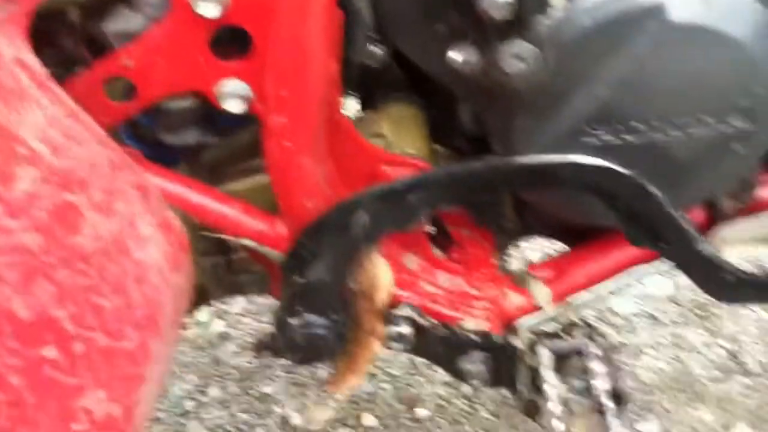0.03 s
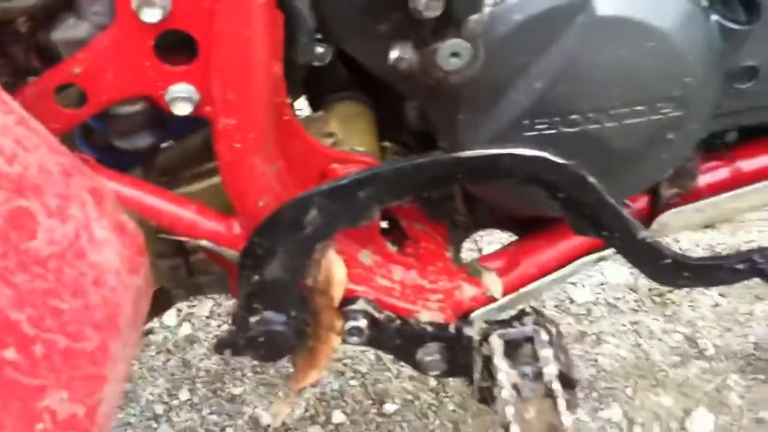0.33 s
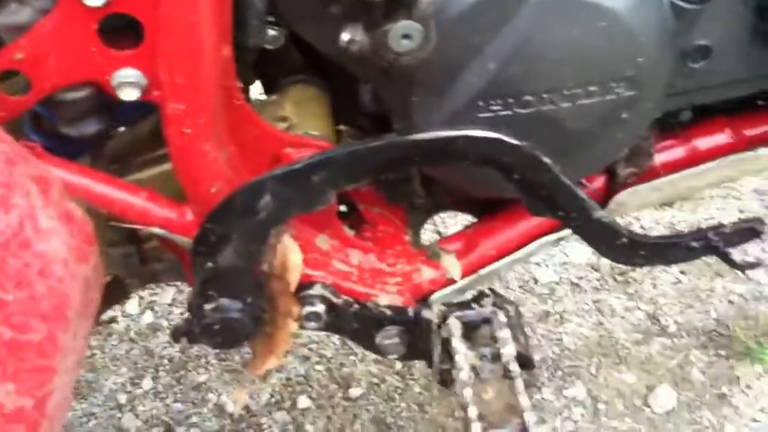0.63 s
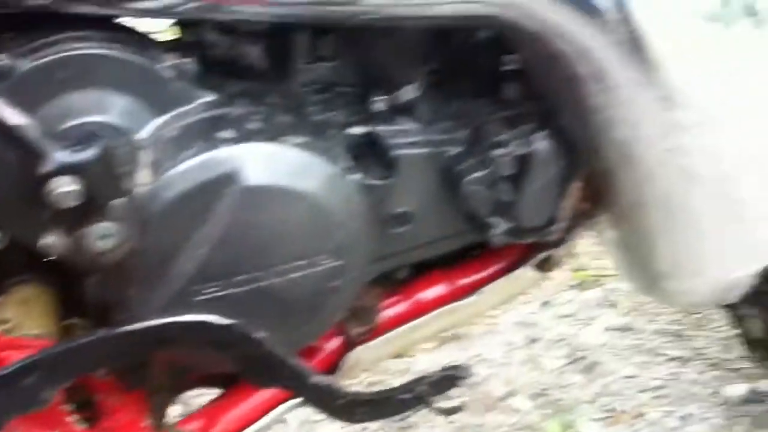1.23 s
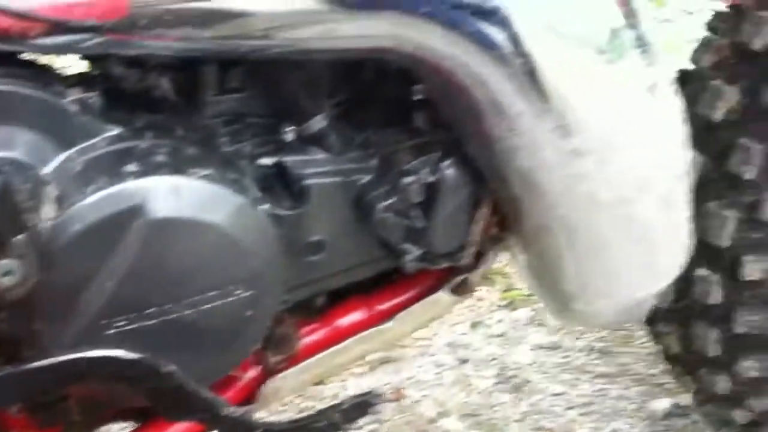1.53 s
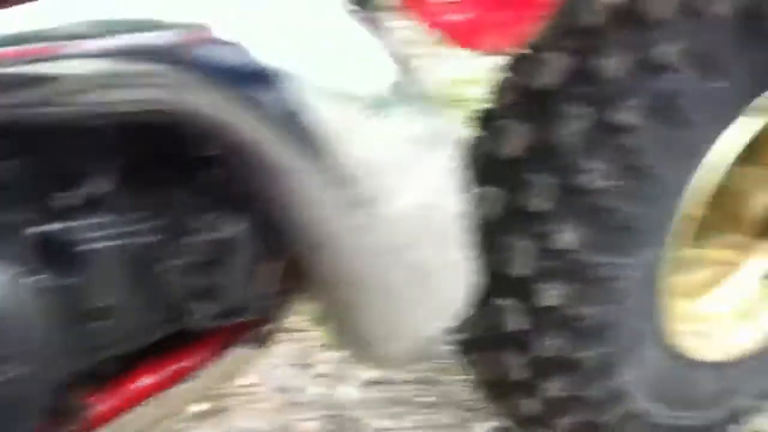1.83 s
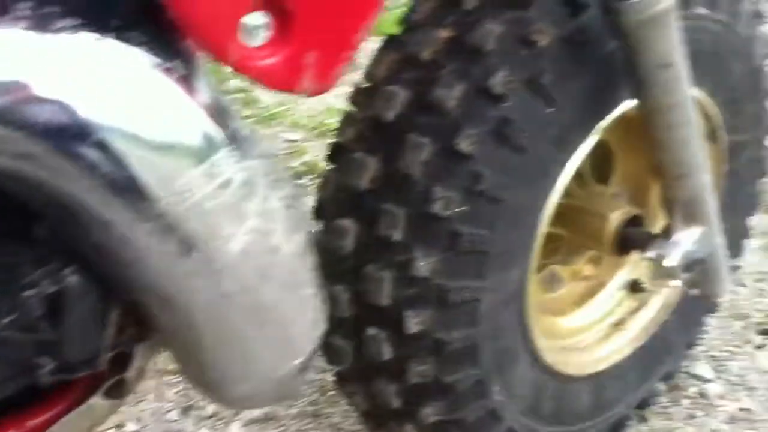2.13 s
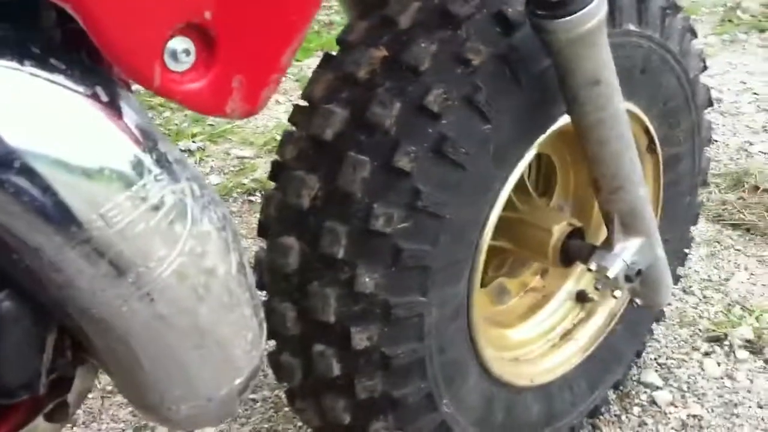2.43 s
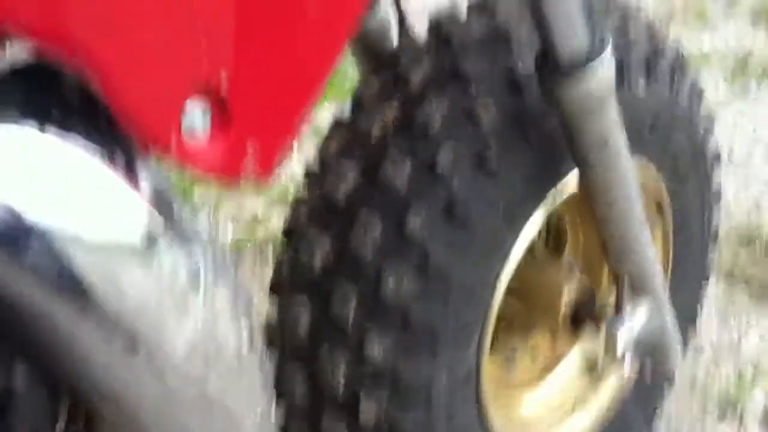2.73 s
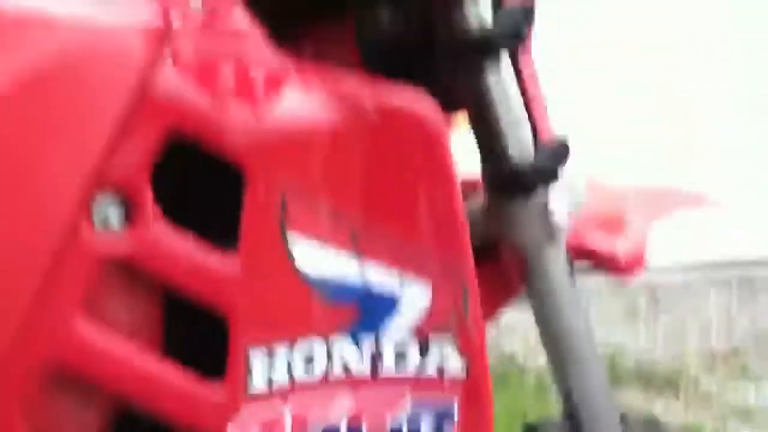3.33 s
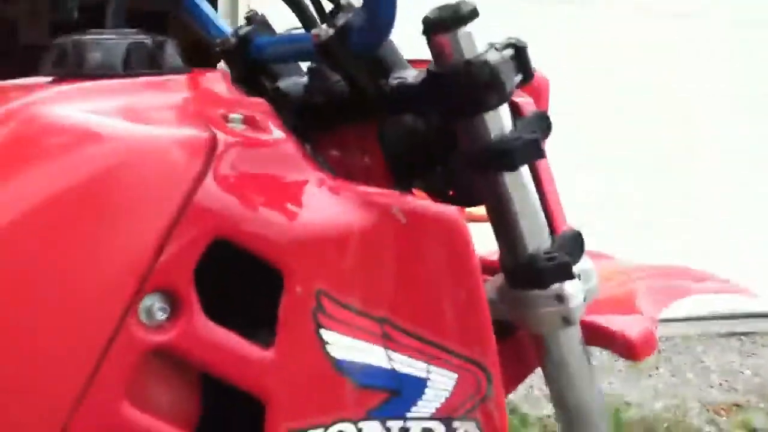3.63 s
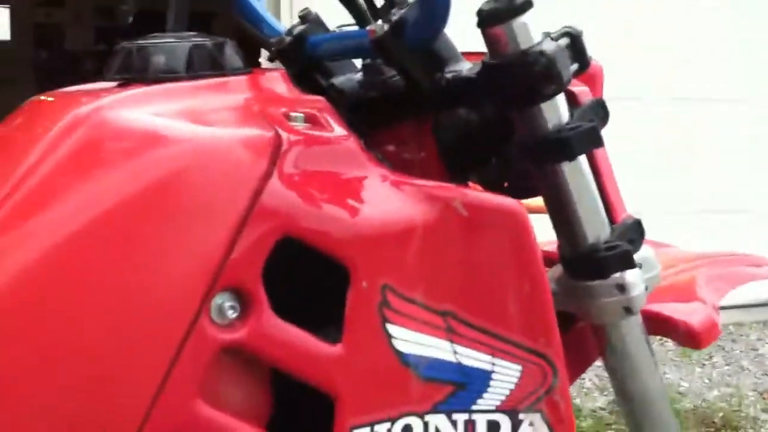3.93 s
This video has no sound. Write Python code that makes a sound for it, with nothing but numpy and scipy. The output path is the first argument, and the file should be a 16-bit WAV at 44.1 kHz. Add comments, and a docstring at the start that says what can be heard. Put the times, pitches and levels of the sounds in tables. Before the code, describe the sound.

A two-stroke engine idles close by, with uneven rapid pops and metallic rattling.

```python
"""A single-cylinder two-stroke engine idles outdoors, close by. From the start, every turn of the crank
puffs through the exhaust, but only some turns fire: those pop harder, ring the pipe and knock the piston
against the finned cylinder. Gears whirr and rattle underneath. As the listener walks along the engine,
the metallic ring changes colour and the crankcase comes forward. Slack gear teeth clack three times
around 1.6 s; near 3.7 s they clack once more, as the crankcase ring recedes."""
import sys
import numpy as np
from scipy import signal
from scipy.fft import rfft, irfft
from scipy.io import wavfile
from scipy.ndimage import uniform_filter1d

SR = 44100
rng = np.random.default_rng(int(sys.argv[2]) if len(sys.argv) > 2 else 0)


def waveform_to_disk(signal):
    """Save audio, clipped to [-1, 1], as 16-bit WAV at the path in sys.argv[1]."""
    frames = np.transpose(np.atleast_2d(signal))
    scaled = np.clip(frames, -1, 1) * 32767
    samples = np.round(scaled).astype(np.int16)
    wavfile.write(sys.argv[1], SR, samples)


N = 176400
HARD_KNOCK_DB = -18  # reference level of a hard firing's knock
KNOCK_LEAD_S, KNOCK_RISE_S = .004, .0042  # a knock starts just ahead of its turn


def amp(db):
    """Decibels to gain."""
    return 10 ** (np.asarray(db) / 20)


def unit(x):
    """Scales to rms 1."""
    return x / np.sqrt(np.mean(x ** 2) + 1e-20)


def colour(x, spectrum):
    """Equalises with a (frequency [Hz], level [dB]) curve, keeping the power of white noise."""
    hz, db = np.transpose(spectrum)
    bins_hz = np.fft.rfftfreq(len(x), 1 / SR)
    gains = amp(np.interp(np.log(bins_hz + 1), np.log(hz + 1), db))
    return irfft(rfft(x) * unit(gains), len(x))


def ramp(u):
    """Smooth step from 0 to 1."""
    return np.sin(np.pi / 2 * np.clip(u, 0, 1))


def bell(t, width_s):
    """Bell-shaped envelope around t = 0."""
    return np.exp(-(t / width_s) ** 2)


def sine(t, hz):
    """Pure tone."""
    return np.sin(2 * np.pi * hz * t)


def play(times, gains, shape):
    """Sums one shape, a function of the time since the event, from 30 ms before to 80 ms after each."""
    out = np.zeros(N)
    for at, gain in zip(times, gains):
        i = np.arange(max(0, int((at - .03) * SR)), min(N, int((at + .08) * SR)))
        out[i] += gain * shape(i / SR - at)
    return out


def follow(points, column=1):
    """Reads a time curve at every sample."""
    table = np.transpose(points)
    return np.interp(np.arange(N) / SR, table[0], table[column])


def resonate(x, hz, width_hz):
    """A resonance of gain 1 whose pitch may move."""
    carrier = np.exp(2j * np.pi * np.cumsum(hz * np.ones(N)) / SR)
    pole = np.exp(-np.pi * width_hz / SR)
    return 2 * (carrier * signal.lfilter([1 - pole], [1, -pole], x / carrier)).real


def crank():
    """The rhythm: between cued turns the crank coasts, slowing a little with every turn."""
    # turns heard singly, mostly firing pops, plus a few weak puffs with hardly any knock:
    # (time [s], exhaust level [dB], piston knock [dB])
    cues = [(-0.001, -8.5, -24), (0.0203, -6, -23.5), (0.0416, -4, -25), (0.063, -6.5, -18.5),
            (0.1928, -7, -17), (0.2142, -9, -38), (0.342, -5, -22.5), (0.3633, -6, -26), (0.449, -5, -24.5),
            (0.4703, -5, -23.5), (0.5121, -4.5, -22), (0.5977, -6, -25.5), (0.6197, -5, -27),
            (0.6415, -4, -22.5), (0.6628, -6, -18.5), (0.791, -7, -18.5), (0.813, -6.5, -24.5),
            (0.9416, -6, -17), (0.9843, -5.5, -20.5), (1.113, -6, -23.5), (1.1355, -6.5, -16.5),
            (1.2657, -7, -16.5), (1.4143, -6, -29.5), (1.457, -6, -19.5), (1.5881, -6.5, -24.5),
            (1.6101, -5, -17), (1.7365, -4.5, -21.5), (1.843, -5, -25.5), (1.8644, -4.5, -21.5),
            (1.9496, -5.5, -23), (1.992, -5, -23.8), (2.0777, -4.5, -19.5), (2.0993, -9.5, -42),
            (2.164, -5.5, -23), (2.207, -5.5, -28), (2.2489, -6, -18), (2.3776, -5.5, -23.5),
            (2.3996, -5.0, -21.5), (2.4856, -6.5, -30), (2.5069, -9, -35), (2.5283, -6, -18),
            (2.6128, -6.5, -22.5), (2.6554, -5.5, -24.5), (2.6981, -6.5, -29.5), (2.7398, -4, -17.5),
            (2.8902, -7, -17.5), (2.9118, -8, -35), (2.9985, -6.5, -28), (3.0195, -5, -22.5),
            (3.062, -7.5, -33), (3.104, -7.5, -32), (3.1468, -7.5, -30), (3.1897, -4, -22.5),
            (3.233, -4.5, -17.5), (3.3174, -7, -30.5), (3.3381, -6.5, -34), (3.359, -13, -48),
            (3.379, -4.5, -19), (3.5289, -5, -21.5), (3.5506, -5.5, -21), (3.701, -5, -17),
            (3.8083, -4.5, -22.5), (3.8302, -4.5, -21), (3.9371, -5, -18), (3.9583, -12.5, -48)]
    # puff of the coasting turns in between: (time [s], level [dB])
    coast_puffs = [(0, -12), (.24, -9.5), (.42, -8.5), (.56, -8), (.75, -10), (.92, -10.5), (1.06, -11.5),
                   (1.22, -11.5), (1.33, -8), (1.43, -8.5), (1.5, -13), (1.56, -14.5), (1.66, -6),
                   (1.8, -6), (2.15, -9), (2.45, -6.5), (2.7, -9), (2.8, -10.5), (2.93, -8), (3.14, -6.5),
                   (3.3, -5.5), (3.43, -11.5), (3.52, -8), (3.62, -9.5), (3.76, -9), (3.9, -6.5), (4, -7.5)]
    turn_s, sag_s_per_turn = .0214, .00019
    spent_db, spent_s = -6, .073  # puffs stay weak for a while after a hard firing
    cue_times, cue_puff_db, cue_knock_db = np.transpose(cues)
    cue_turns = 4 + np.r_[0, np.cumsum(np.round(np.diff(cue_times) / turn_s))].astype(int)
    turns = np.arange(cue_turns[-1] + 10)
    times = turns * turn_s + np.interp(turns, cue_turns, cue_times - cue_turns * turn_s)
    upcoming = np.clip(np.searchsorted(cue_turns, turns), 1, len(cue_turns) - 1)
    sag = np.maximum((turns - cue_turns[upcoming - 1]) * (cue_turns[upcoming] - turns), 0)
    times -= sag_s_per_turn / 2 * sag
    since = times[:, None] - cue_times
    hardness = np.minimum(amp(cue_knock_db - HARD_KNOCK_DB), 1)
    spent = ((since > turn_s / 2) * bell(since, spent_s) * hardness).max(1)
    scatter = rng.standard_normal((len(turns), 2))
    puff_db = np.interp(times, *np.transpose(coast_puffs)) + spent_db * spent + .9 * scatter[:, 0]
    knock_db = -42 - .5 * scatter[:, 1]  # a coasting piston only taps
    puff_db[cue_turns], knock_db[cue_turns] = cue_puff_db, cue_knock_db
    return times, np.isin(turns, cue_turns), puff_db, knock_db


def exhaust(times, cued, puff_db, knock_db):
    """The open port lets out a puff and a rush of gas; the pipe rings on, and hard firings thump."""
    # rush of gas at the port: (frequency [Hz], level [dB])
    gas_spectrum = [(200, -9), (450, 0), (600, -6), (830, 0.5), (1200, 5.5), (1700, 5), (3000, -6),
                    (8000, -37)]
    port_open_s, port_rise_s, port_shut_s = .0103, .0038, .003
    pipe_rise_s, pipe_decay_s = .00076, .0093
    null_hz, null_width_hz = 215, 78  # the silencer cancels this band
    outlet_hz = 100  # the narrow outlet radiates little below this

    def port_puff(t):
        return sine(t, hz=379) * ramp(t / port_rise_s) * ramp((port_open_s - t) / port_shut_s)

    def pipe_ring(t):
        return sine(t, hz=401.8) * ramp(t / pipe_rise_s) * np.exp(-abs(t) / pipe_decay_s)

    def low_thud(t, hz=163):
        return -np.cos(2 * np.pi * hz * t) * bell(t, width_s=.0078)

    size = amp(puff_db)
    puff = play(times, size * amp(-.6), port_puff)
    pipe_delay_s = np.where(cued, .00859, .010105)
    pipe = play(times + pipe_delay_s, size * amp(np.where(cued, -6, -13.5)), pipe_ring)
    gas = play(times + .00065, size * amp(-21.5), lambda t: bell(t, width_s=.0054))
    gas *= colour(rng.standard_normal(N), gas_spectrum)
    thud = play(times + .00706, np.full(len(times), amp(-40)), low_thud)
    weight = amp(knock_db - HARD_KNOCK_DB) ** 2
    shake = play(times, amp(-39.5) * weight, lambda t: sine(t, hz=46.7) * bell(t, width_s=.0048))
    boom = play(times + .0038, amp(-29.5) * weight, lambda t: sine(t, hz=112) * bell(t, width_s=.0045))
    silencer = signal.iirnotch(null_hz, null_hz / null_width_hz, fs=SR)
    outlet = signal.butter(4, outlet_hz, "highpass", fs=SR, output="sos")
    note = signal.filtfilt(*silencer, puff + pipe + gas)
    return signal.sosfiltfilt(outlet, note + thud + boom) + shake


def piston(times, knock_db):
    """Each knock is a scuff, a crack that stands out on hard hits, then a dense ring of the cases."""
    # tone colour of the cylinder and cases: (frequency [Hz], level [dB])
    casing_spectrum = [(300, -24.5), (800, 5), (1200, -6), (1600, -17.5), (2600, -0.5), (3050, -7),
                       (3400, -5), (4200, -5), (4800, -1), (5100, -10.5), (6000, -2.5), (7300, -6),
                       (8500, -4), (10200, -2), (12000, -9.5), (13500, -14.5), (15500, -34)]
    # how long they ring: (frequency [Hz], t60 [s])
    casing_decay = [(500, 0.081), (1500, 0.22), (3000, 0.22), (6000, 0.27), (10000, 0.15), (15000, 0.13)]
    crack_db, crack_growth, crack_fall_s = -3.5, .8, .0025
    scuff_db, scuff_lead_s, ring_db = -14, .007, 1

    def crack(t):
        return ramp(t / KNOCK_RISE_S) * np.exp(-np.maximum(t - KNOCK_RISE_S, 0) / crack_fall_s)

    starts, size = times - KNOCK_LEAD_S, amp(knock_db)
    cracks = play(starts, size * amp(crack_growth * (knock_db - HARD_KNOCK_DB)), crack)
    scuffs = play(times - scuff_lead_s, np.minimum(size, amp(-12)), lambda t: bell(t, width_s=.006))
    attack = amp(crack_db) * cracks + amp(scuff_db) * scuffs
    out = attack * colour(rng.standard_normal(N), casing_spectrum)
    # every blow feeds energy into the cases, and each band lets it go at its own rate
    energy = play(starts, size ** 2, lambda t: (t > 0) * (t < KNOCK_RISE_S) / (KNOCK_RISE_S * SR))
    noise_bins = rfft(colour(rng.standard_normal(N), casing_spectrum))
    bins_hz = np.fft.rfftfreq(N, 1 / SR)
    centres_hz, t60s = np.transpose(casing_decay)
    for band, t60 in zip(np.eye(len(centres_hz)), t60s):
        stored = signal.lfilter([1], [1, -np.exp(-2 * np.log(1000) / (t60 * SR))], energy)
        band_noise = irfft(noise_bins * np.interp(bins_hz, centres_hz, band), N)
        out += amp(ring_db) * np.sqrt(stored) * band_noise
    return out


def fins(times, knock_db):
    """The knocks ring the cooling fins; each tone swells and fades as the listener crosses its lobes."""
    # modes of the fins and covers:
    # (frequency [Hz], level [dB], t60 [s], lobe middle [s], lobe spacing [s], dip between lobes [dB])
    modes = [(857, 2, 0.26, .3, 5.4, 22), (1035, 5.5, 0.13, .3, 7.5, 23), (1740, 0, 0.32, 2.4, 3.3, 11),
             (2053, 2.5, 0.3, 1.9, 4.6, 11), (2390, 2.5, 0.33, 3, 7.9, 22), (3160, -3, 0.28, 5.4, 6.2, -2),
             (3335, -3, 0.31, 2.5, 3.7, 1), (3460, 6.5, 0.22, 3.83, 5, 34), (3535, 4.5, .25, .4, 5, 10),
             (3908, 2.5, .35, 2.3, 3.8, 12), (4390, -2, .2, .8, 5, 5), (4556, 1.5, .35, .4, 3.3, 3),
             (4700, -4, .2, 3.7, 12, 32), (4810, 1, 0.27, 3.3, 7.7, 33), (5030, -2.5, 0.16, 5, 3.8, 23),
             (5350, -4, 0.2, 0.67, 4, 6), (5550, 4.5, .25, 1.9, 4.2, 12), (5610, 1, .25, 2.7, 4, 9),
             (5680, 0, .25, .6, 4, 8), (5900, 0, .3, 2.6, 4, 5), (6120, -1, 0.083, 1.2, 3.3, 2),
             (6600, 3, 0.13, 2.1, 5, 4), (6702, -5, 0.17, 1.8, 4, 7), (6770, -8.5, 0.25, .4, 1.8, 21),
             (7010, 3.5, 0.23, .7, 4.6, 4), (7550, 4, 0.19, 0.93, 6.4, 6), (7640, 5, 0.1, 1.1, 2.8, 20),
             (8300, 2, 0.15, 3.3, 2.4, 7)]
    fins_db, spread_hz = -12, 7
    t = np.arange(SR // 3) / SR
    out = np.zeros(N + SR)
    starts = np.clip((times - KNOCK_LEAD_S) * SR, 0, N).astype(int)
    for hz, db, t60, middle_s, spacing_s, dip_db in modes:
        envelope = amp(fins_db + db) * ramp(t / KNOCK_RISE_S) * np.exp(-np.log(1000) * t / t60)
        heard = amp(knock_db - dip_db * np.sin(np.pi * (times - middle_s) / spacing_s) ** 2)
        for i, size, (offset, detune) in zip(starts, heard, rng.uniform(-.9, 1, (len(times), 2))):
            phase = 2 * np.pi * (hz + spread_hz * detune) * t + np.pi * offset
            out[i:i + len(t)] += size * envelope * np.cos(phase)
    return out[:N]


def gears(times):
    """Gears and bearings whirr, throbbing with each turn. Returns the whirr and its rattling envelope."""
    # gear whirr: (frequency [Hz], level [dB])
    whirr_spectrum = [(25, -36), (70, -42), (125, 0), (170, -9.5), (240, -3), (540, 1.5), (640, -6),
                      (800, 1.5), (1250, -1.5), (1480, 1), (1610, -5.5), (1780, 1.5), (2000, 1), (2400, 4),
                      (2750, 1), (3000, -5), (3900, -8.5), (5500, -8), (7500, -16.5), (10500, -14.5),
                      (15000, -44)]
    # lift of the whirr as the listener moves along the engine: (time [s], level [dB])
    nearness = [(0, 2.5), (1, 1.5), (1.7, 1.5), (2.6, 1.5), (3.3, 0.7), (4, 1.5)]
    whirr_db, grain_db = -27.5, 2.03
    throb_depth, peak_turn = .29, .64
    turns = np.interp(np.arange(N) / SR, times, np.arange(len(times)))
    throb = 1 + throb_depth * np.cos(2 * np.pi * (turns - peak_turn))
    grain = unit(uniform_filter1d(rng.standard_normal(N), size=90))
    rattle = unit(throb * amp(grain_db * grain))
    whirr = unit(colour(rattle * rng.standard_normal(N), whirr_spectrum))
    return amp(whirr_db + follow(nearness)) * whirr, rattle


def crankcase(rattle):
    """The steady gear rattle and a few clacks of slack teeth ring the crankcase."""
    # crankcase resonances: (frequency [Hz], width [Hz], level [dB])
    modes = [(2020, 57, -6), (2127, 34, -4), (2336, 106, 0.5), (2430, 63, -3.5), (2522, 80, -9)]
    # rattle in the crankcase, loudest where the listener passes it: (time [s], level [dB])
    rattle_levels = [(0, -45), (.6, -30), (1.25, -31), (1.52, -30.5), (1.8, -28.5), (2.4, -32),
                     (2.9, -30.5), (3.3, -37), (4, -43)]
    # slack gear teeth clacking: (time [s], level [dB])
    clacks = [(1.5555, -31), (1.58, -22), (1.601, -15), (3.6715, -27)]
    clack_times, clack_db = np.transpose(clacks)
    force = rattle * amp(follow(rattle_levels))
    force += play(clack_times, amp(clack_db), lambda t: (t > 0) * bell(t, width_s=.0036))
    out = np.zeros(N)
    for hz, width_hz, db in modes:
        teeth = force * rng.standard_normal(N)
        ring = resonate(resonate(teeth, hz, 2 * width_hz), hz, 2 * width_hz)
        makeup_gain = np.sqrt(SR / (np.pi * width_hz) / 2)
        out += amp(db) * makeup_gain * ring
    return out


def reflection(clatter):
    """A reflection hollows out one treble band, which shifts with the listener."""
    # the cancelled band: (time [s], frequency [Hz], depth [0-1])
    hollow = [(0, 3800, 0.5), (1, 3820, 0.8), (1.5, 4100, 0.6), (2.8, 4060, 0), (3.3, 4070, 1),
              (4, 4030, .7)]
    depth = np.clip(follow(hollow, column=2), 0, 1)
    return clatter - depth * resonate(clatter, follow(hollow), width_hz=150)


def scene():
    """Exhaust, piston, fins, gears and crankcase, all driven by one crank."""
    slap_spread_s = .003  # a coasting piston slaps at loose moments
    times, cued, puff_db, knock_db = crank()
    slaps = times + ~cued * slap_spread_s * rng.standard_normal(len(times))
    knocks = piston(slaps, knock_db)
    whirr, rattle = gears(times)
    clatter = reflection(knocks + whirr + crankcase(rattle))
    return (exhaust(times, cued, puff_db, knock_db) + clatter + fins(slaps, knock_db))[None]


def record(dry):
    """Soft clipping rounds off the hardest pops, then a steep low-pass trims the top end."""
    knee, ceiling, cutoff_hz = .5, .74, 15800
    headroom = ceiling - knee
    over = np.maximum(abs(dry) - knee, 0)
    rounded = dry + np.sign(dry) * (headroom * np.tanh(over / headroom) - over)
    lowpass = signal.firwin(511, cutoff_hz, window=("kaiser", 9), fs=SR)
    return signal.oaconvolve(rounded, lowpass[None], "same")


dry = scene()
out = record(dry)
waveform_to_disk(out)
```